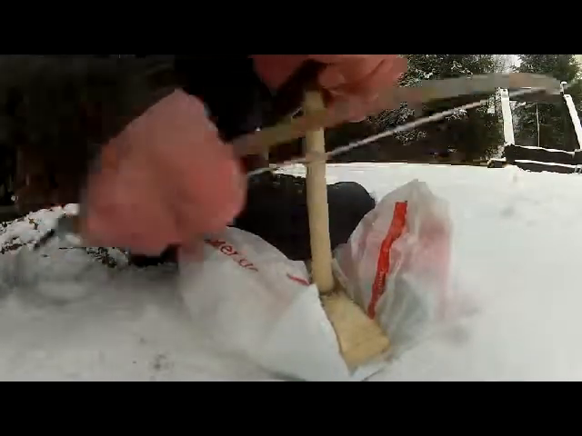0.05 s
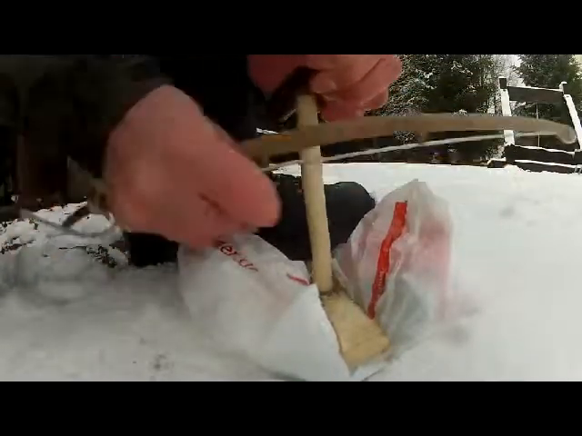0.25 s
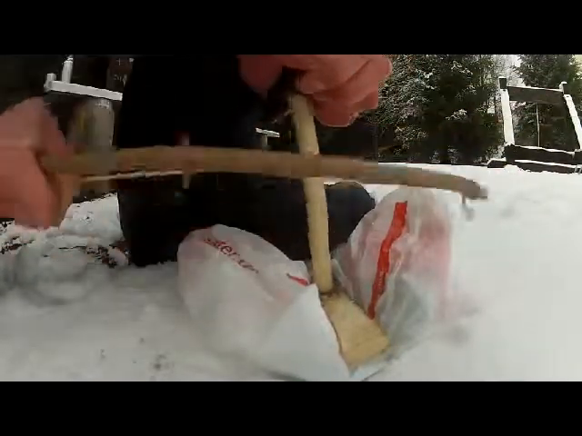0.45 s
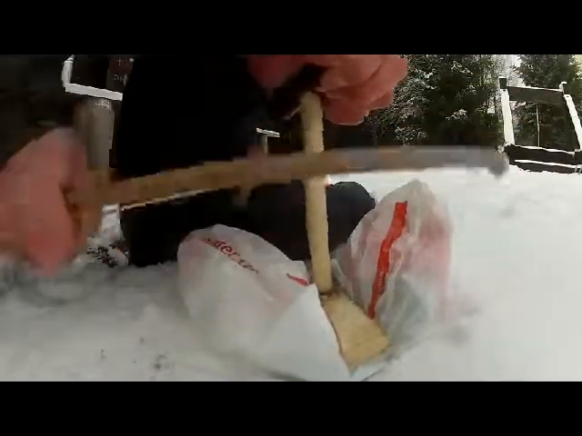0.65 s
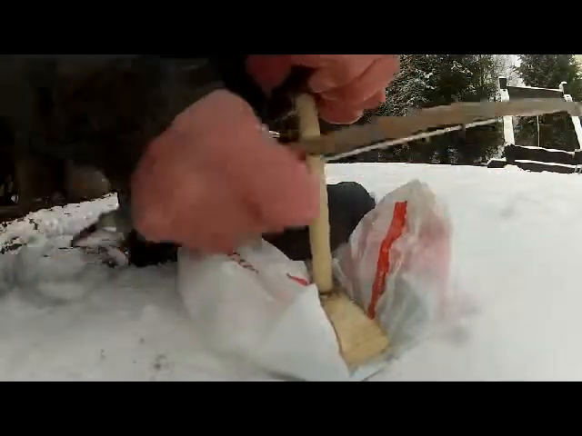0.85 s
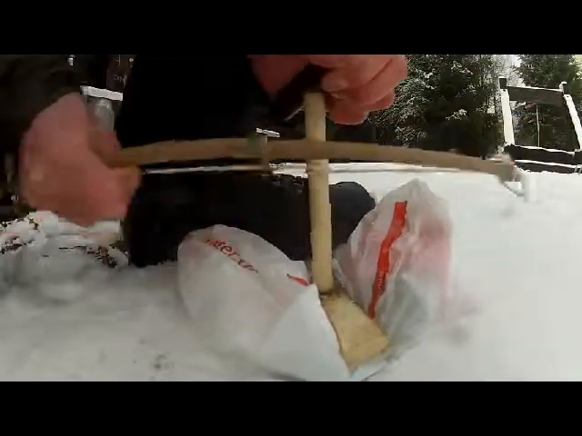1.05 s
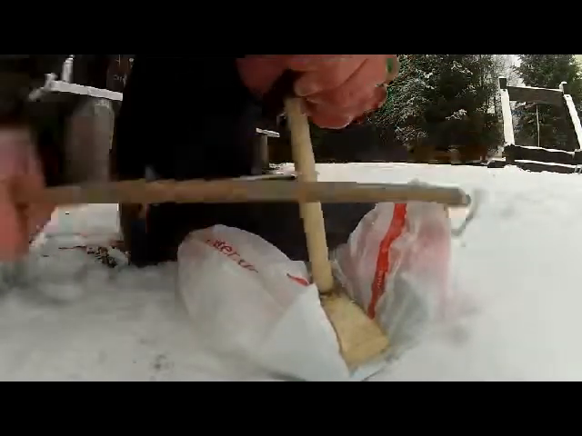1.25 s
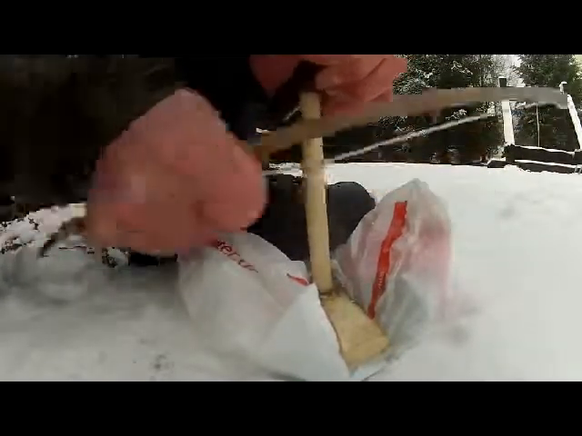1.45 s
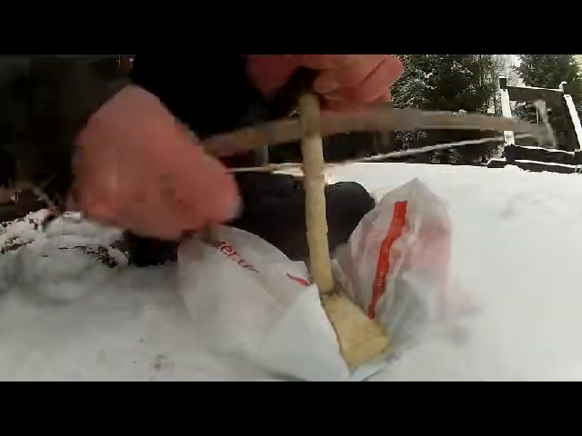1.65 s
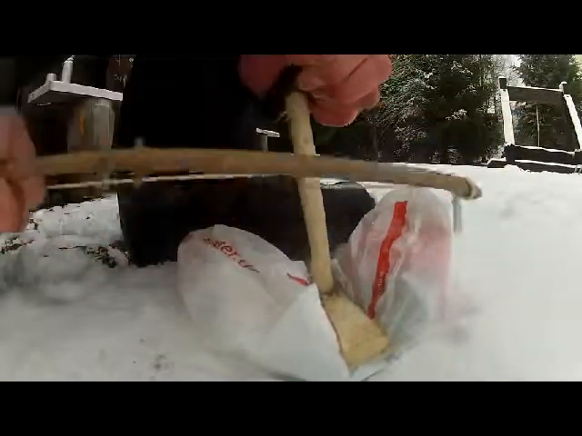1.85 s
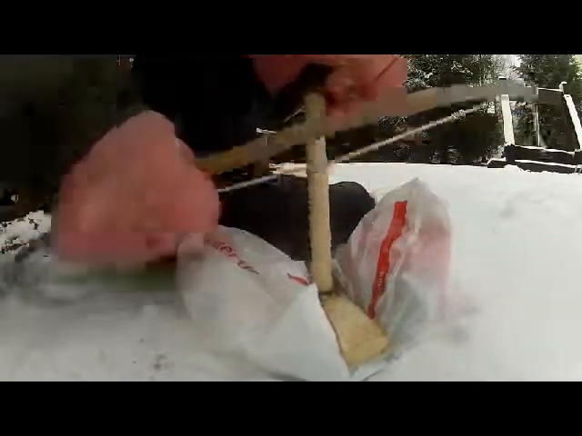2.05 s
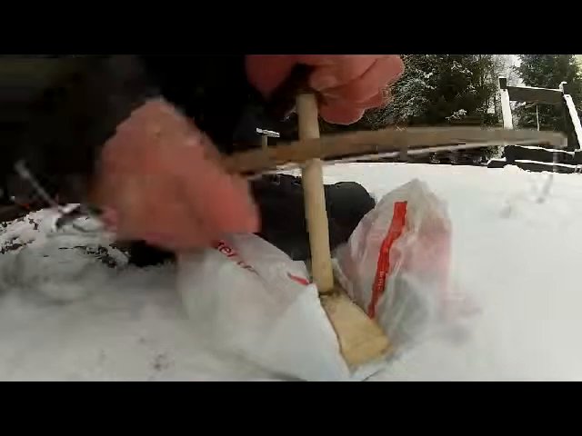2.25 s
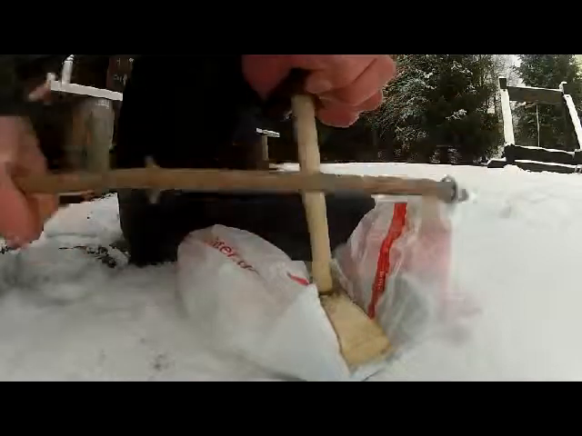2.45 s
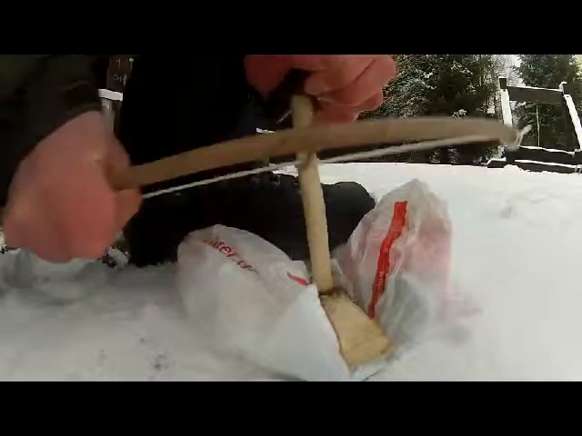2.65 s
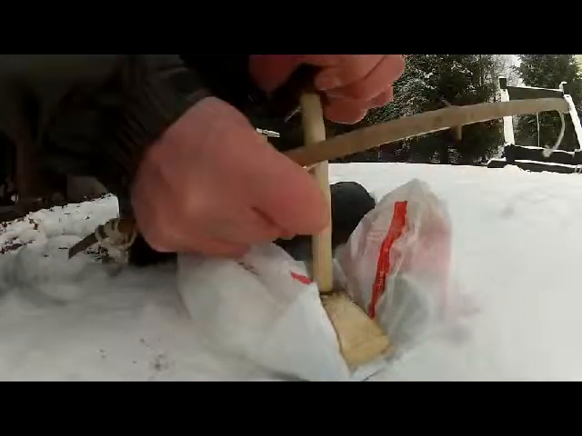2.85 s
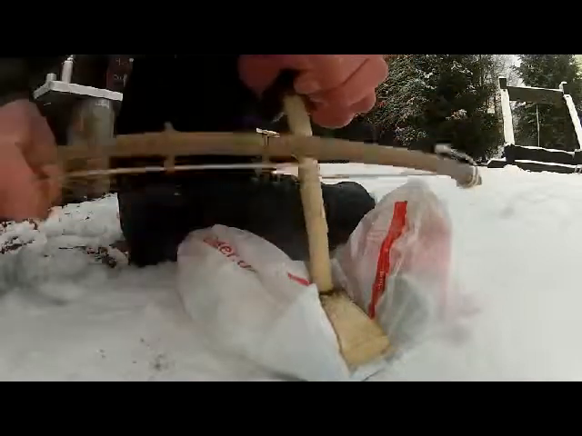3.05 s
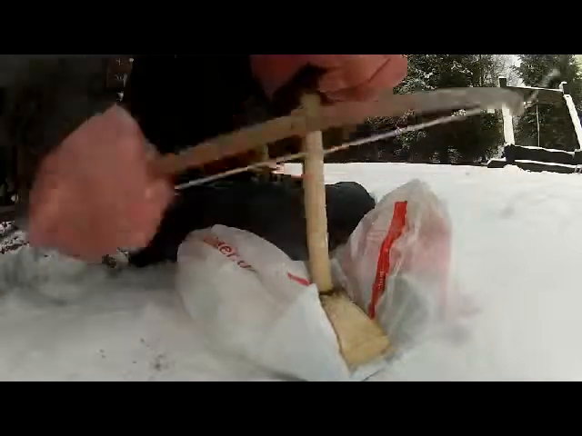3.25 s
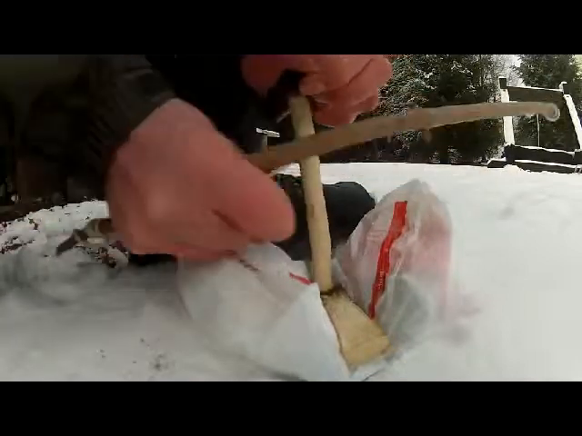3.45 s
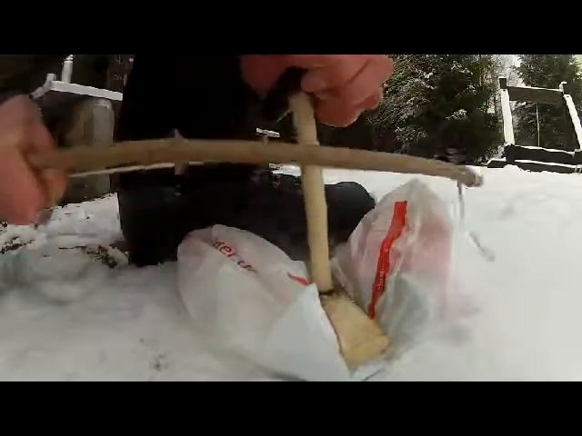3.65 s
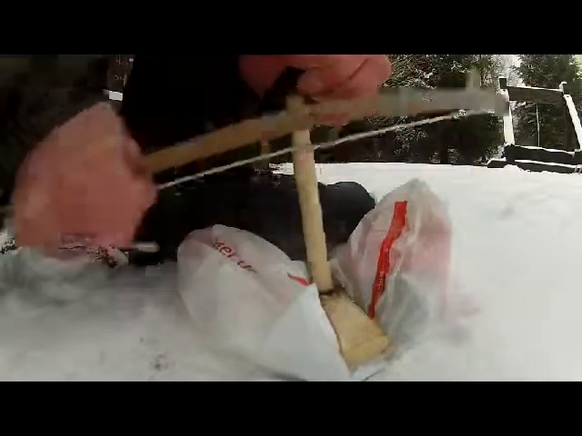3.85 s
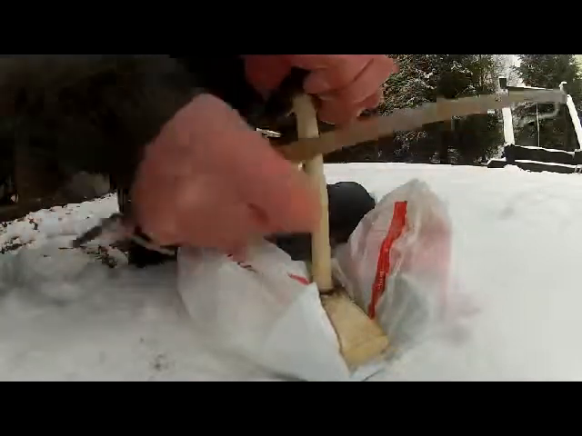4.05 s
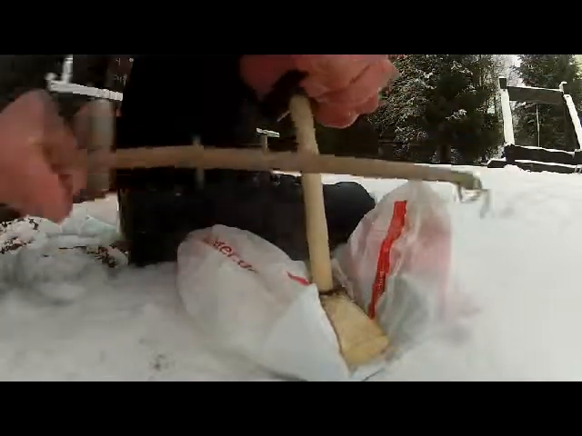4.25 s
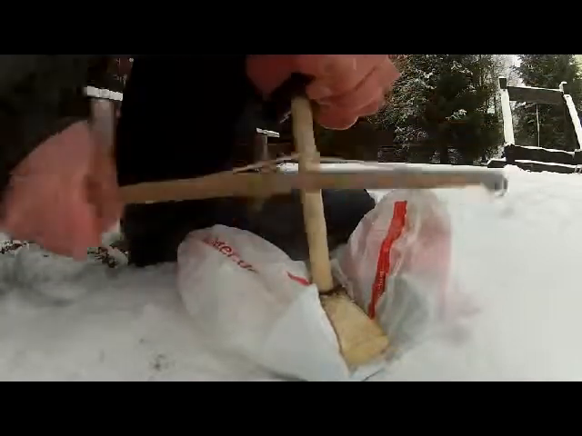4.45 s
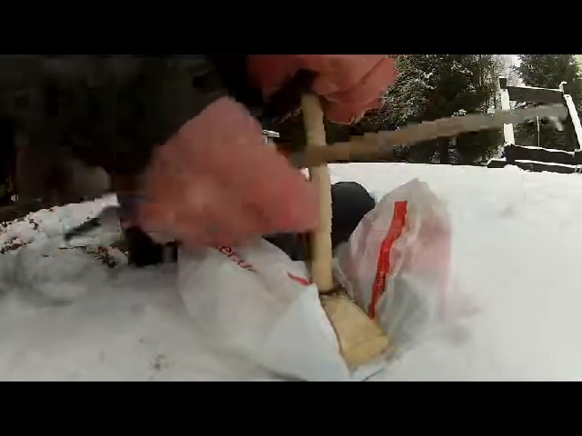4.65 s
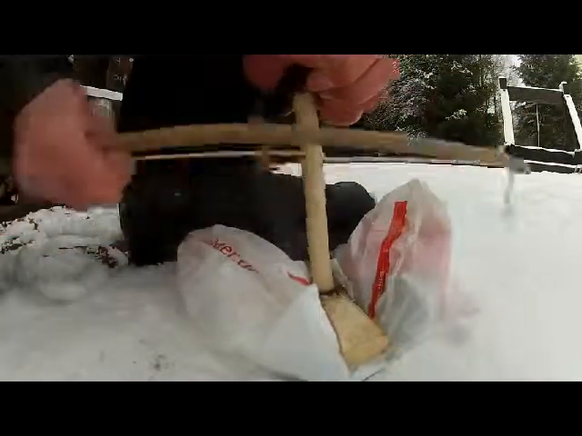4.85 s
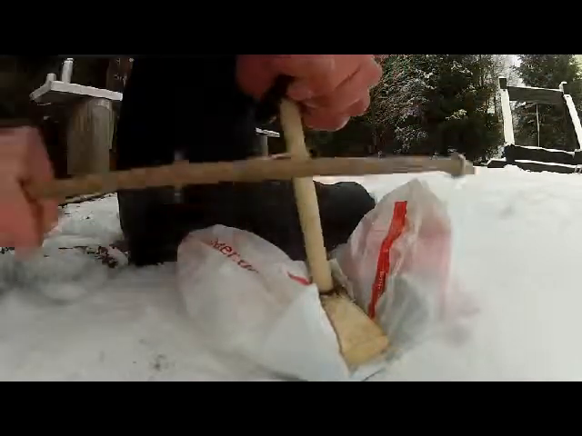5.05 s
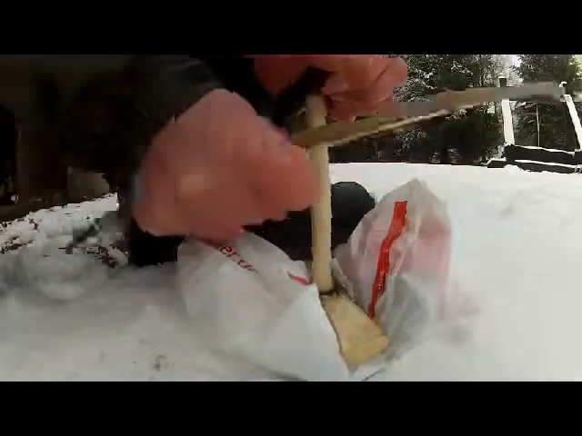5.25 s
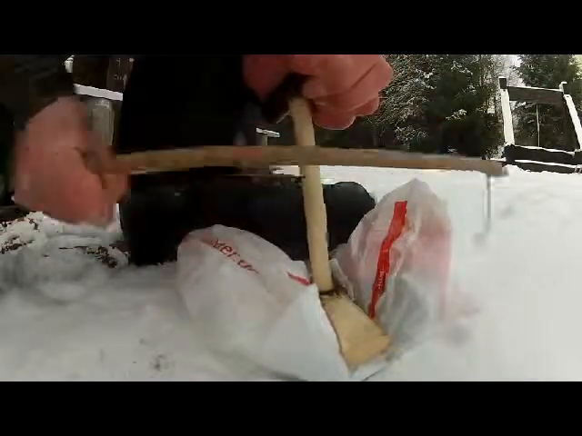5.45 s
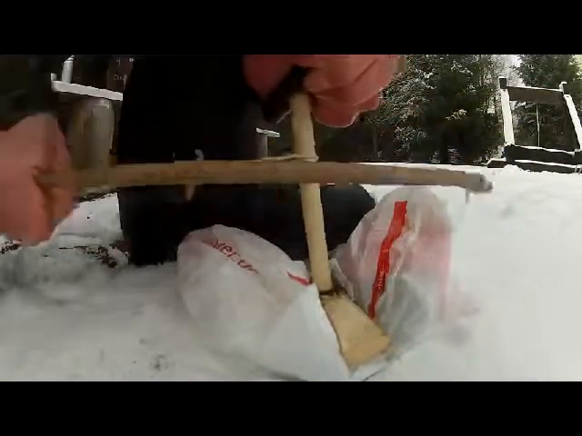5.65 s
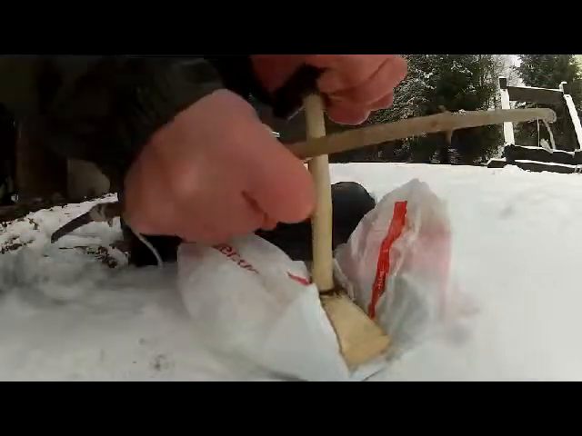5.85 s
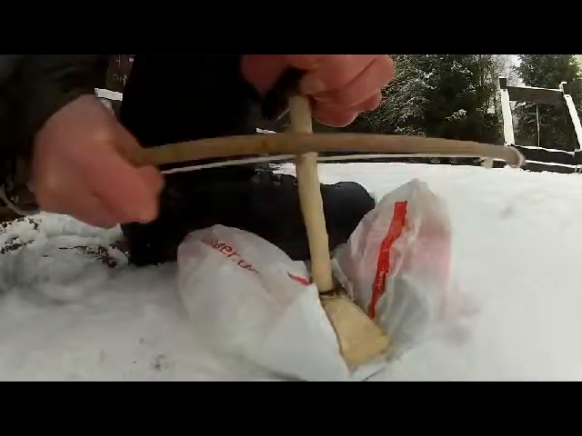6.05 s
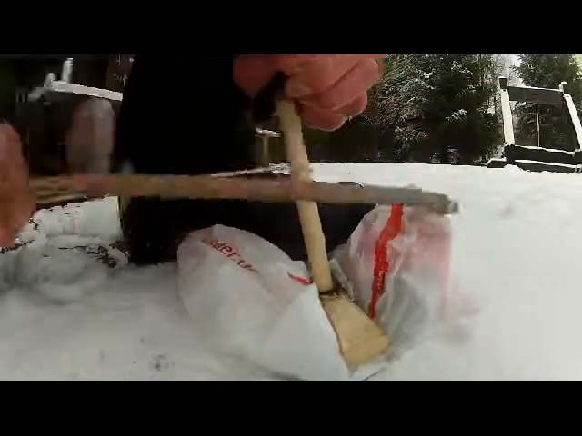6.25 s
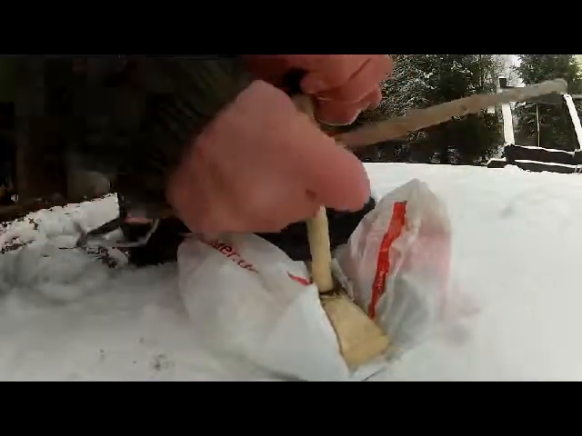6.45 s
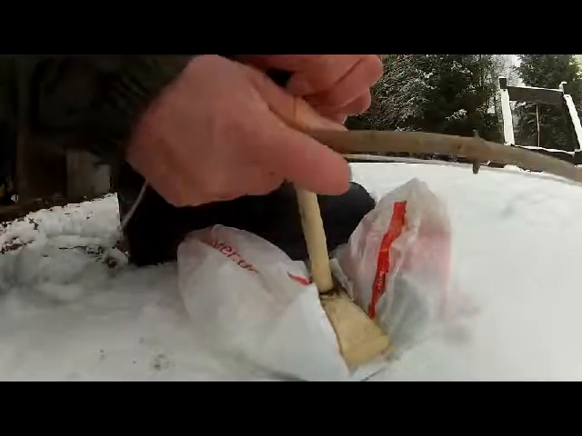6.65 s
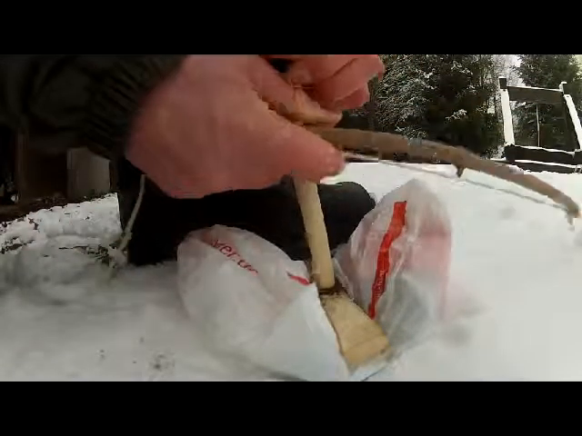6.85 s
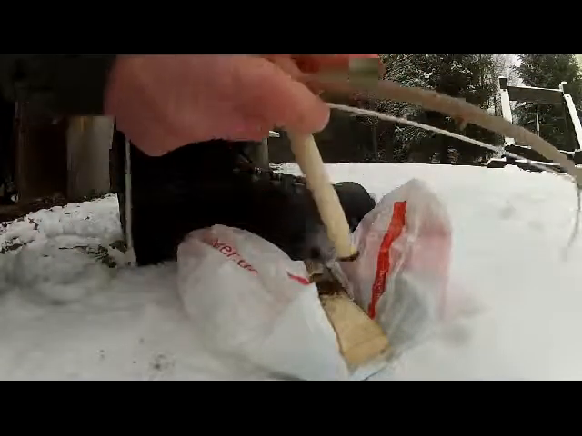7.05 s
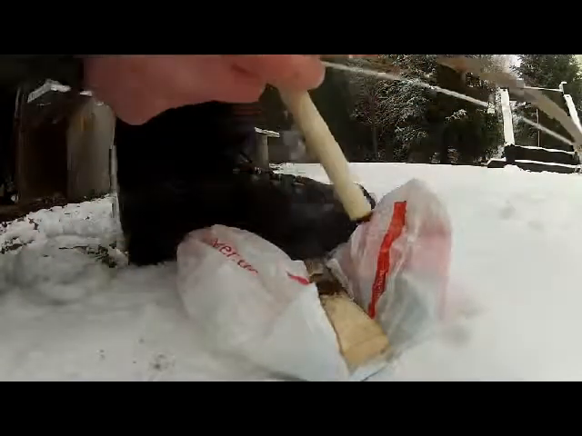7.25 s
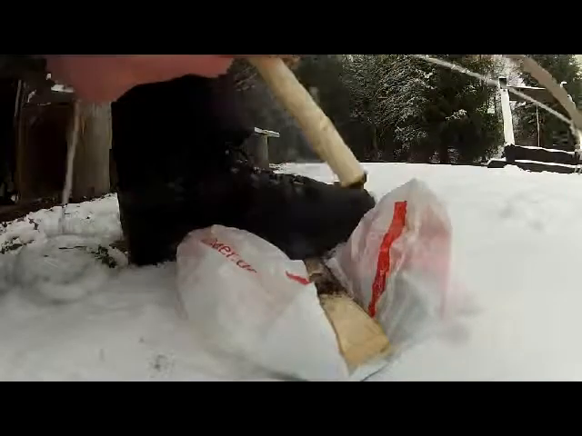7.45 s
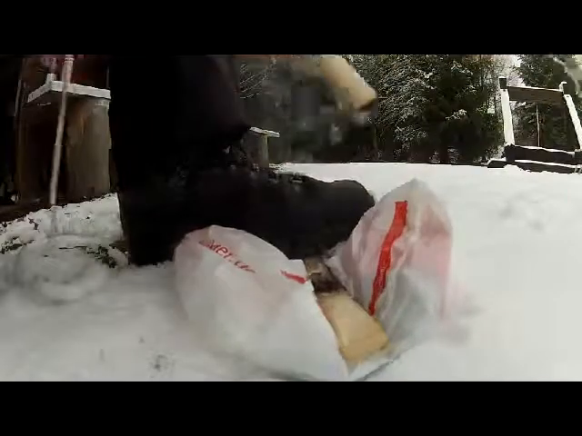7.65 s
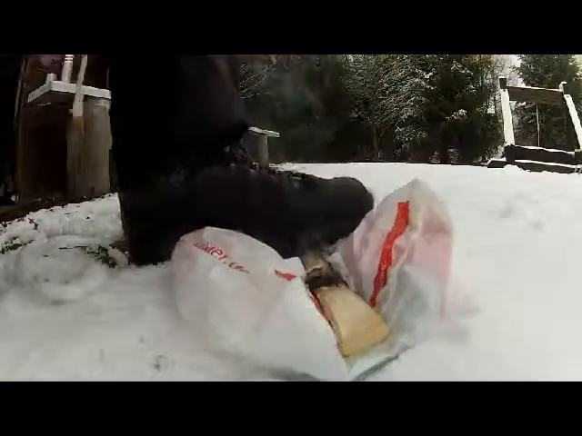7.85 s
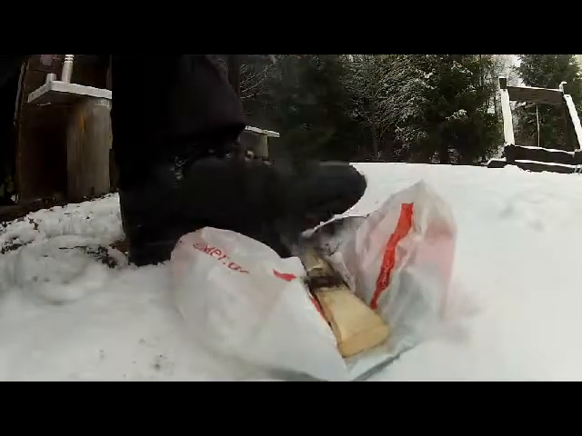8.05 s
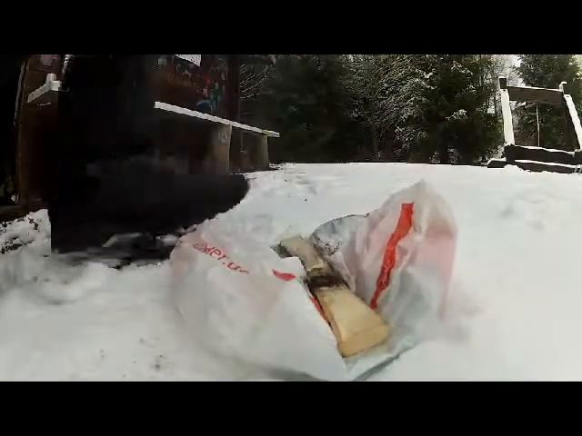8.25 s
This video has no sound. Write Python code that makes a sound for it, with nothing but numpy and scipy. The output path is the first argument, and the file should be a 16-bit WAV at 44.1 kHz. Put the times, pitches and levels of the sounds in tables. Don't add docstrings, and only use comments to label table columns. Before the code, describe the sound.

Very close microphone, dry and centred: a wooden stick judders in a wooden board in quick alternating firm and lighter strokes. Low muffled thudding dominates, topped by rasping fibres, irregular sharp ticks and an occasional brief plastic crinkle. The rhythm cuts off near the end, followed by small nudges, light taps, faint clothing and snow rustle, and one late soft bump over quiet winter air.

```python
import sys
import numpy as np
from scipy import signal
from scipy.io import wavfile
from scipy.ndimage import uniform_filter1d

SR = 44100
rng = np.random.default_rng(int(sys.argv[2]) if len(sys.argv) > 2 else 0)


def decibels_to_gain(level_db):
    exponent = np.asarray(level_db, float) / 20
    return 10 ** exponent


def wav_out(sig):
    wavfile.write(sys.argv[1], SR, np.round(np.clip(np.atleast_2d(sig).T, -1, 1) * 32767).astype(np.int16))


N = 366471
STOP_S = 6.46


def rms_one(x):
    return x / np.sqrt(np.mean(x ** 2) + 1e-20)


def at_hz(points, hz):
    table_hz, value = np.transpose(points)
    return np.interp(np.log(hz), np.log(table_hz), value)


def band(x, low_hz, high_hz, order=2):
    return signal.sosfilt(signal.butter(order, [low_hz, high_hz], "band", fs=SR, output="sos"), x)


def resonate(x, hz, width_hz):
    r = np.exp(-np.pi * width_hz / SR)
    feedback = [1, -2 * r * np.cos(2 * np.pi * hz / SR), r * r]
    return signal.lfilter(np.array([1, 0, -1]) * (1 - r * r) / 2, feedback, x + 1e-18)


def body(x, modes):
    return sum((-1) ** k * decibels_to_gain(db) * resonate(x, hz, width_hz) for k, (hz, width_hz, db) in enumerate(modes))


def grains(per_s, spread_db):
    sizes = decibels_to_gain(spread_db * np.minimum(rng.exponential(1, N), 4))
    signs = rng.choice([-1, 1], N)
    return rms_one(sizes * signs * (rng.random(N) < per_s / SR))


# (first slip [s], length [s], peak [dB], place of peak [0-1], tearing [dB])
PUSHES = [(.083, 0.088, -30, 0.52, -51), (.379, 0.069, -22.5, 0.46, -56), (.663, 0.048, -24.5, 0.51, -56),
          (.929, 0.085, -29, 0.42, -51), (1.219, 0.08, -26, 0.68, -56), (1.506, .082, -26.5, .4, -53),
          (1.815, 0.065, -26, 0.24, -54), (2.098, 0.068, -26, 0.43, -60), (2.382, 0.073, -26, 0.6, -57),
          (2.665, 0.073, -25, 0.56, -47.5), (2.965, 0.076, -27, .45, -52.5),
          (3.243, 0.074, -27, .45, -54.5), (3.545, 0.058, -24.5, 0.92, -55),
          (3.834, 0.078, -26.5, 0.38, -56.5), (4.148, 0.0647, -26.5, 0.62, -54.5),
          (4.437, 0.065, -25.5, .45, -48), (4.692, 0.094, -28.5, .7, -57.5),
          (5.009, .053, -24.5, 0.45, -50), (5.309, 0.075, -27, 0.6, -56), (5.629, 0.055, -31, 0.29, -52.5),
          (5.912, 0.065, -26.5, 0.64, -51), (6.186, 0.0668, -25, .55, -51)]
# (first slip [s], length [s], peak [dB], place of peak [0-1], tearing [dB])
PULLS = [(.008, 0.0061, -31, 0.22, -48.5), (0.243, 0.055, -32, 0.6, -49), (0.532, 0.055, -33.5, 0.47, -58),
         (0.803, 0.042, -29, 0.85, -56), (1.083, 0.056, -30, .75, -51), (1.373, 0.065, -33.5, 0.44, -51.5),
         (1.658, 0.044, -28, 0.83, -55), (1.959, 0.052, -29.5, 0.41, -59), (2.247, 0.052, -32, 0.66, -54),
         (2.534, .068, -29.5, .35, -54.5), (2.827, 0.06, -33.5, 0.4, -52),
         (3.108, 0.053, -29.5, 0.78, -58.5), (3.395, 0.064, -31.5, 0.55, -60),
         (3.691, 0.065, -31, 0.4, -52), (3.99, 0.056, -29, 0.74, -56), (4.286, 0.05694, -31, 0.56, -51),
         (4.576, 0.065, -32, 0.57, -56), (4.854, 0.074, -30.5, 0.52, -55), (5.149, 0.061, -29.5, .7, -55),
         (5.456, .07, -30.5, 0.36, -57), (5.75, .056, -29, 0.54, -54), (6.045, 0.068, -29, .45, -55),
         (6.336, 0.081, -31, 0.56, -51.5)]
# (time [s], peak [dB])
TURNS = [(.324, -44), (.628, -45), (.894, -39.5), (1.192, -45), (1.475, -51), (1.757, -46), (1.898, -47.5),
         (2.059, -42), (2.349, -48), (2.918, -41.5), (3.186, -48), (3.212, -49), (3.639, -45.5),
         (4.105, -44), (4.395, -40), (5.58, -41.5), (5.87, -44), (6.001, -46), (6.157, -44.5), (6.461, -38)]
PUSH_GAP_S, PULL_GAP_S = 0.0165, 0.023
PUSH_SAG_DB, PULL_SAG_DB = 22, 10
SLIP_SPREAD_DB, SLIP_JITTER = 2.01, 0.12
THUD_HZ, HZ_PER_DB, SPREAD_HZ, TURN_HZ = 215, 2.5, 14.09, 211


def slips():
    rows = [(s, db, TURN_HZ) for s, db in TURNS]
    chance = iter(rng.standard_normal((len(PUSHES + PULLS), 3, 9)))
    for strokes, gap_s, sag_db in ((PUSHES, PUSH_GAP_S, PUSH_SAG_DB), (PULLS, PULL_GAP_S, PULL_SAG_DB)):
        for (start_s, length_s, db, peak, _), (late, hard, sharp) in zip(strokes, chance):
            count = min(round(length_s / gap_s) + 1, len(late))
            place = np.linspace(0, 1, count)
            level_db = db - sag_db * (place - peak) ** 2 - SLIP_SPREAD_DB * np.abs(hard[:count])
            jitter_s = SLIP_JITTER * gap_s * late[:count] * np.sin(np.pi * place)
            pitch_hz = THUD_HZ + HZ_PER_DB * (level_db + 32) + SPREAD_HZ * sharp[:count]
            rows += zip(start_s + place * length_s + jitter_s, level_db, pitch_hz)
    return sorted(rows)


# (time [s], peak [dB], pitch [Hz])
NUDGES = [
    (6.495, -55, 220),
    (6.574, -55, 199),
    (6.625, -53.5, 233),
    (6.661, -48.5, 222),
    (6.899, -55.5, 198),
    (8.124, -48.5, 250),
    (8.151, -55, 160),
]
THUD_S = 0.0038


def thuds():
    rows = np.array(slips() + NUDGES)
    t = np.arange(-1200, 1200) / SR
    sound, pressure = np.zeros(N + 2400), np.zeros(N + 2400)
    rocking = np.cumsum(np.diff(rows[:, 0], prepend=0) * rows[:, 2])
    for (s, db, hz), turn, (jolt, stretch) in zip(rows, rocking, rng.random((len(rows), 2))):
        width_s = THUD_S * (1.1 + 0.8 * stretch)
        swell = decibels_to_gain(db) * np.exp(-0.5 * (t / width_s) ** 2)
        span = slice(round(s * SR), round(s * SR) + 2400)
        sound[span] += swell * np.cos(2 * np.pi * (hz * t + turn + 0.69 * jolt))
        pressure[span] += swell
    return sound[1200:-1200], pressure[1200:-1200]


MURMUR_DB, GROUND_HZ, GROUND_WIDTH_HZ = -55, 81, 30


def shaking(thud, pressure):
    noise = rng.standard_normal((2, N))
    load = uniform_filter1d(pressure, size=500) + decibels_to_gain(MURMUR_DB) * (np.arange(N) < STOP_S * SR)
    board = thud + load * decibels_to_gain(-2.5) * rms_one(band(noise[0], 143, 312))
    board = signal.sosfiltfilt(signal.butter(4, [118, 325], "band", fs=SR, output="sos"), board)
    ground = decibels_to_gain(-19.5) * rms_one(resonate(noise[1], GROUND_HZ, GROUND_WIDTH_HZ))
    return board + load * ground


def swells(t, centres_s, levels_db, rise_s, fall_s):
    away = t - centres_s[:, None]
    return decibels_to_gain(levels_db) @ np.exp(-0.5 * (away / np.where(away < 0, rise_s, fall_s)) ** 2)


TEAR_RISE_S, TEAR_FALL_S, TEAR_REST_DB = 0.029, 0.02, -64.5
SWISH_DB, SWISH_FOLLOWS, SWISH_REST_DB = -59, 0.33, -70


def friction():
    t = np.arange(0, N + 64, 64) / SR
    moving = t < STOP_S
    tear, swish = decibels_to_gain(TEAR_REST_DB) * moving, decibels_to_gain(SWISH_REST_DB) * moving
    for strokes, lag_s, rise_s, linger_s in ((PUSHES, 0.015, 0.032, 0.03), (PULLS, 0, 0.082, 0.049)):
        start_s, length_s, _, peak, tear_db = np.transpose(strokes)
        tear = tear + swells(t, start_s + peak * length_s, tear_db - 2.0, TEAR_RISE_S, TEAR_FALL_S)
        swish_db = SWISH_DB + SWISH_FOLLOWS * (tear_db - tear_db.mean())
        swish = swish + swells(t, start_s + length_s / 2 + lag_s, swish_db, rise_s, linger_s)
    return [np.interp(np.arange(N) / SR, t, level) for level in (tear, swish)]


def wandering(x, modes, patchy_db):
    knots = np.arange(0, N + 2000, 2000)
    out = 0
    for k, (mode, row) in enumerate(zip(modes, rng.standard_normal((len(modes), len(knots))))):
        drift = np.interp(np.arange(N), knots, row)
        out = out + (-1) ** k * decibels_to_gain(patchy_db * drift) * body(x, [mode])
    return rms_one(out)


# (frequency [Hz], width [Hz], level [dB])
BOARD = [(480, 156, 1.5), (690.6, 44, 6), (898, 67, 1), (1180, 81, 6.5), (1380, 330, 1.5), (1610, 244, 1.5)]
# (frequency [Hz], width [Hz], level [dB])
SPINDLE = [(1944, 380, -7), (2336, 140, -1.5), (2998, 227, -4.5), (3726, 520, -8), (5010, 2700, -15),
           (5970, 510, -7.5)]


def rubbing(pressure):
    tearing, swishing = friction()
    gust = (pressure + 0.0057) / (uniform_filter1d(pressure, size=3000) + 0.018)
    tear = wandering(grains(1000, spread_db=5.0), BOARD, patchy_db=2.0) * gust ** 0.5
    swish = wandering(grains(4000, spread_db=3.0), SPINDLE, patchy_db=3.0) * gust ** 0.45
    return tearing * tear + swishing * swish


# (frequency [Hz], level per Hz [dB])
AIR = [(25, 0), (80, 2), (200, 3.5), (400, -3), (800, -10), (1500, -11.5), (2300, -14), (4000, -16.5),
       (5600, -16.5)]
# (frequency [Hz], correlation [-1 to 1])
LIKENESS = [(40, 0.97), (400, 0.96), (2400, 0.85), (5000, 0.65)]
AIR_DB = -63.5


def air():
    out, edges_hz = 0, 25 * 2 ** np.arange(0, 8.1, 0.5)
    white = rng.standard_normal((2, 2, N))
    for k, (low_hz, high_hz) in enumerate(zip(edges_hz, edges_hz[1:])):
        mid, side = band(white[k % 2], low_hz, high_hz)
        hz = np.sqrt(low_hz * high_hz)
        alike = np.clip(at_hz(LIKENESS, hz), -1, 1)
        stereo = np.sqrt(1 + alike) * mid + np.sqrt(1 - alike) * side * [[1], [-1]]
        out = out + decibels_to_gain(at_hz(AIR, hz)) * stereo
    return decibels_to_gain(AIR_DB) * rms_one(out)


# (time [s], peak [dB], ring [Hz])
TICKS = [(0.291, -44.5, 1460), (0.401, -42, 950), (0.472, -42.5, 1300), (0.556, -43.5, 1370),
         (0.947, -47, 1119), (1.246, -42.5, 937), (1.379, -44, 1450), (1.656, -45, 1226),
         (2.271, -47, 1174), (2.679, -41, 1166), (3.418, -38.5, 1244), (3.738, -42.5, 1527),
         (3.792, -46.5, 1141), (3.855, -35.5, 866), (3.979, -47, 1399), (4.01, -41, 1239),
         (4.036, -42.5, 1156), (4.443, -32.5, 1207), (4.585, -42.5, 1180), (5.008, -33.5, 889.4),
         (5.089, -45, 1270), (5.344, -41, 1180), (5.482, -39.5, 1245), (5.507, -41.5, 1173),
         (5.573, -48.5, 1157), (5.779, -39.5, 1577), (6.037, -48.5, 1448), (6.089, -41, 862),
         (6.149, -46.5, 1180), (6.179, -49, 1418),
         (.246, -50, 1560), (.269, -48, 1150), (0.671, -46.5, 1180), (.918, -54.5, 1430),
         (1.091, -47, 1380), (1.267, -44, 918), (1.521, -48, 1180), (1.593, -44, 1128), (1.702, -57, 1527),
         (1.847, -43, 1180), (2.185, -42.5, 1357), (2.429, -41.5, 908), (2.553, -45, 1189),
         (2.577, -41, 1194), (2.82, -49.5, 1293), (2.98, -49, 904), (3.154, -50, 1560), (3.232, -55, 1423),
         (3.931, -50.5, 1461), (4.33, -40.5, 1240), (4.62, -41.5, 1212), (4.761, -47, 1226),
         (4.873, -45.5, 1505), (5.198, -41, 1180), (5.711, -45, 1630), (5.803, -48, 1309),
         (6.276, -46.5, 1302), (6.331, -51, 1570), (6.359, -44, 1409), (6.386, -44, 1146)]
# (time [s], peak [dB], ring [Hz])
TAPS = [
    (6.494, -51, 928),
    (6.57, -68, 648),
    (6.6, -59, 1203),
    (6.622, -66, 703),
    (6.667, -62, 2290),
    (6.893, -57, 2230),
    (7.33, -61, 2200),
]
TICK_DB, RATTLE_S, CRUNCH, TICK_CUT_HZ = 4, 0.0021, 0.69, 2850


def ticks():
    out, t = np.zeros(N + 1500), np.arange(1500) / SR
    rows = TICKS + TAPS
    for (s, db, hz), noise in zip(rows, rng.standard_normal((len(rows), 1500))):
        age = t / RATTLE_S / decibels_to_gain(CRUNCH * max(db + 42.5, 0))
        rattle = np.sign(noise) * np.minimum(2.7 * age + 0.21, 1) * np.exp(-age)
        tick = decibels_to_gain(17) * resonate(rattle, hz, 230)
        tick = tick + decibels_to_gain(7) * body(rattle, BOARD) + decibels_to_gain(6.5) * body(rattle, SPINDLE)
        tick = band(tick, 340, TICK_CUT_HZ)
        out[round(s * SR):][:1500] += decibels_to_gain(db + TICK_DB) * tick / np.abs(tick).max()
    return out[:N]


# (time [s], peak [dB], decay [s])
CRINKLES = [
    (1.158, -53.5, 0.02),
    (2.009, -52, 0.04),
    (4.545, -50, 0.0051),
    (6.229, -52, 0.044),
    (6.495, -54, 0.0052),
    (6.892, -52.5, 0.0065),
    (6.922, -61, .006),
]


def crinkles():
    swell, t = np.zeros(N + 4000), np.arange(4000) / SR
    for s, db, decay_s in CRINKLES:
        swell[round(s * SR):][:4000] += decibels_to_gain(db) * np.exp(-t / decay_s)
    crackle = grains(4300, spread_db=0.0) * swell[:N]
    bright = decibels_to_gain(7.5) * band(crackle, 2430, 4488, order=1)
    return bright + decibels_to_gain(1.5) * band(crackle, 920, 2340) + decibels_to_gain(13.5) * resonate(crackle, 2340, 210)


# (time [s], level [dB])
RUSTLE = [
    (6.4, -97),
    (6.58, -75),
    (6.75, -88),
    (7.25, -84),
    (7.33, -75),
    (7.45, -76),
    (7.7, -66.5),
    (7.95, -70.5),
    (8.2, -77),
]


def rustle():
    level = decibels_to_gain(np.interp(np.arange(N) / SR, *np.transpose(RUSTLE)))
    crackle = grains(1200, spread_db=3.5)
    return level * rms_one(band(crackle, 1197, 4350, order=1) + decibels_to_gain(5) * resonate(crackle, 2180, 210))


def scene():
    thud, pressure = thuds()
    low = shaking(thud, pressure)
    wood = rubbing(pressure) + ticks() + crinkles() + rustle()
    apart = decibels_to_gain(-15) * np.roll(band(wood, 1800, 6900, order=1), 300)
    apart = apart + decibels_to_gain(-37) * np.roll(low, 300) + decibels_to_gain(-24) * np.roll(band(low, 25, 90), 900)
    return low + wood + apart * [[1], [-1]] + air()


def roll_off(x):
    return signal.sosfilt(signal.butter(12, 15400, fs=SR, output="sos"), x)


def record(dry):
    dry = dry - np.array([resonate(side, 6100, 800) for side in dry])
    slow = signal.resample_poly(dry, 40, 147, axis=1, window=("kaiser", 2.0))
    held = np.repeat(slow, 4, axis=1)
    out = signal.resample_poly(held, 147, 160, axis=1)[:, :N]
    out = out + decibels_to_gain(-12) * np.roll(band(out[0], 9600, 15000), 200) * [[1], [-1]]
    hz, _, cells = signal.stft(out, SR, nperseg=1024)
    cells = cells * decibels_to_gain(np.interp(hz, [9000, 12000], [0, -2.2]))[:, None]
    level = uniform_filter1d(np.abs(cells.mean(axis=0)), size=5, axis=0)
    floor_db = np.interp(hz, [5000, 9500, 11500, 13500], [-125, -117, -108, -110])
    keep = (level >= decibels_to_gain(floor_db)[:, None]) & (hz < 15400)[:, None]
    out = signal.istft(cells * keep, SR, nperseg=1024)[1][:, :N]
    return roll_off(out)


dry = scene()
out = record(dry)
wav_out(out)
```